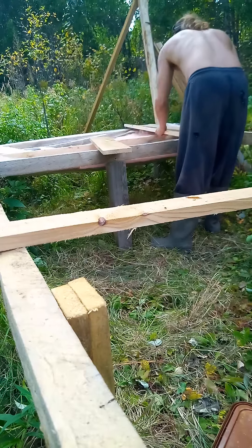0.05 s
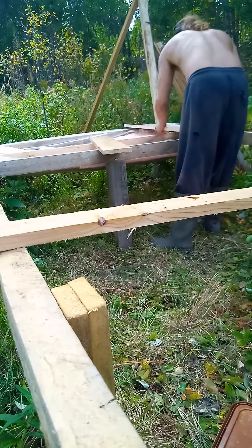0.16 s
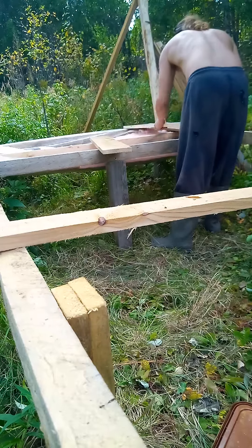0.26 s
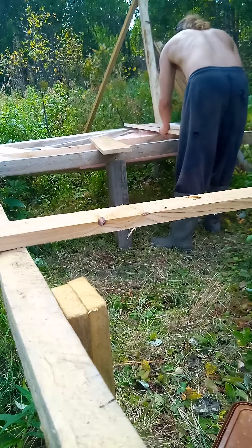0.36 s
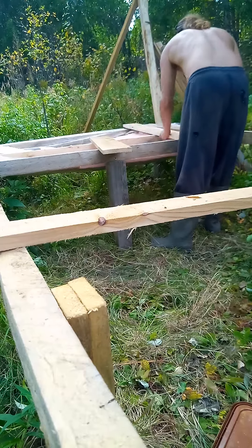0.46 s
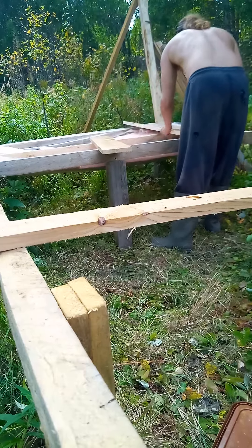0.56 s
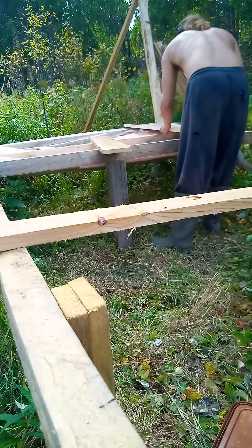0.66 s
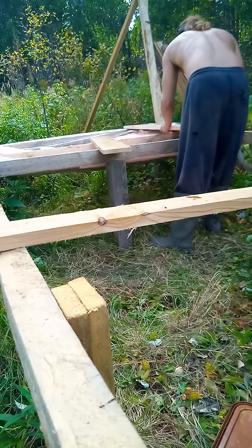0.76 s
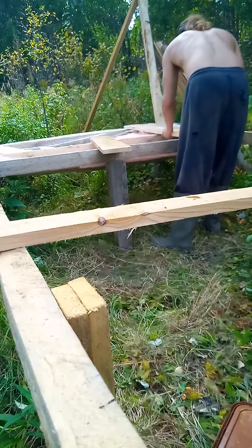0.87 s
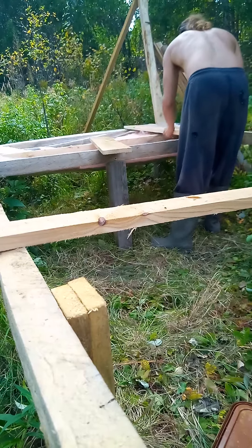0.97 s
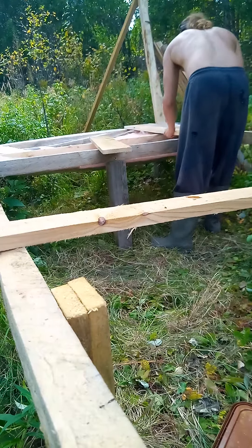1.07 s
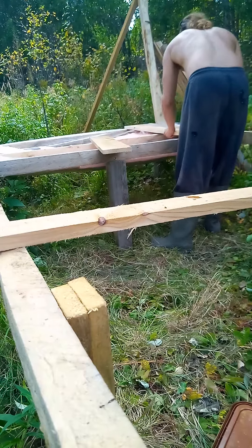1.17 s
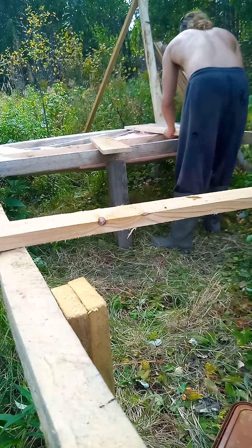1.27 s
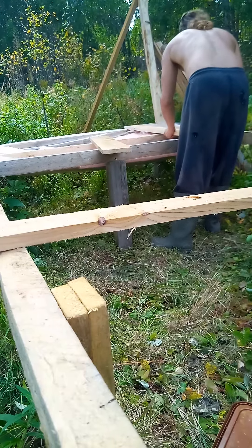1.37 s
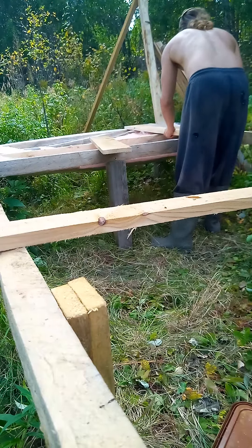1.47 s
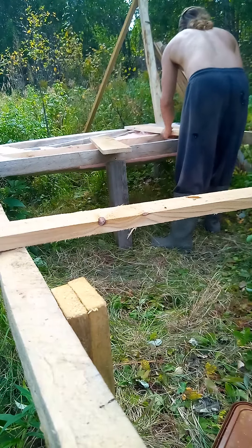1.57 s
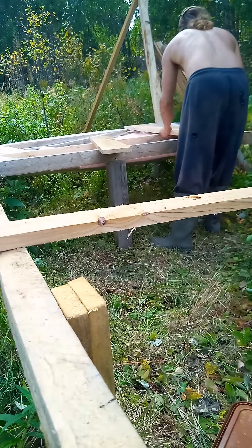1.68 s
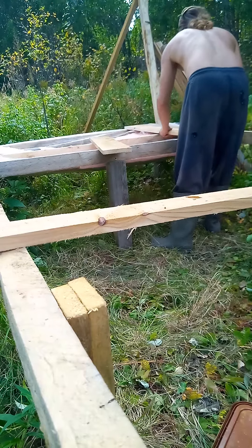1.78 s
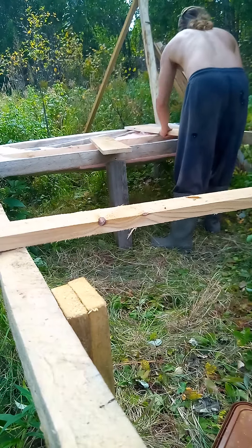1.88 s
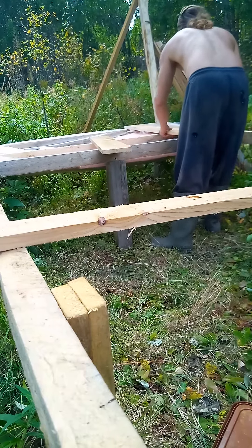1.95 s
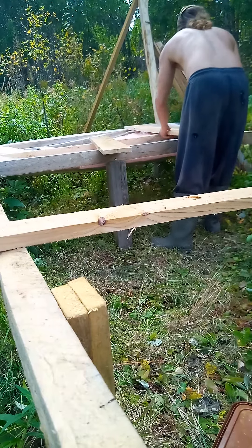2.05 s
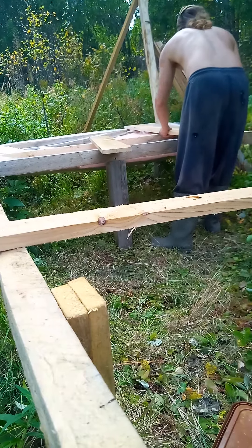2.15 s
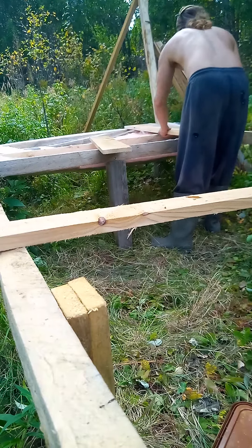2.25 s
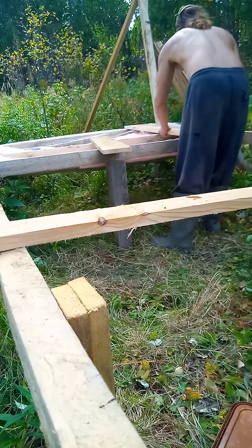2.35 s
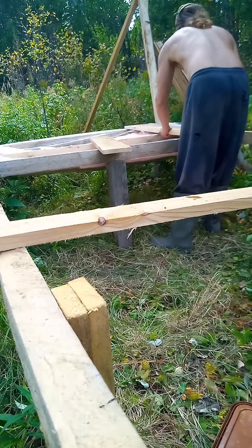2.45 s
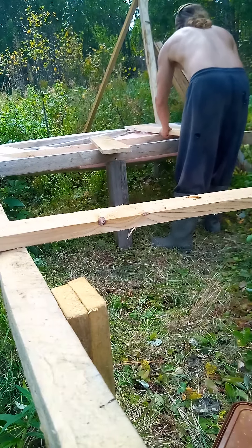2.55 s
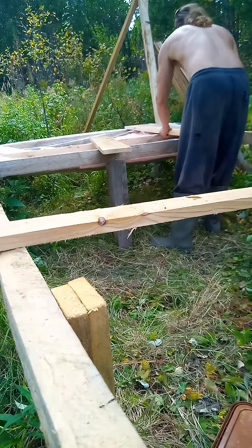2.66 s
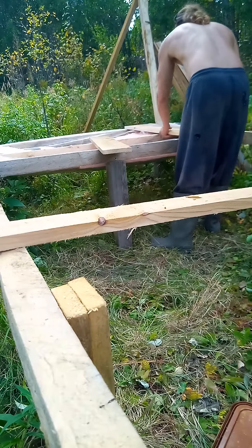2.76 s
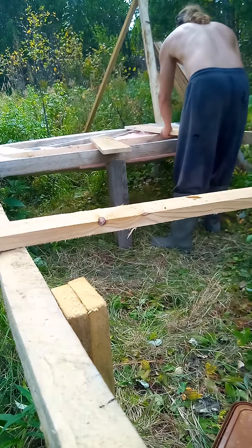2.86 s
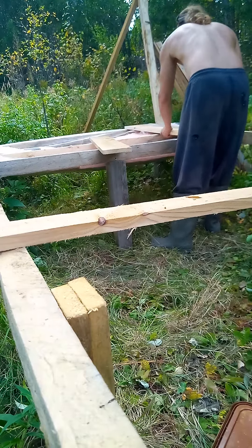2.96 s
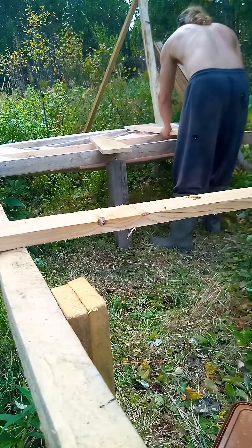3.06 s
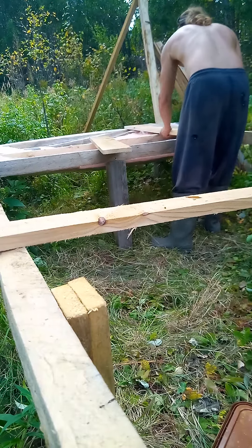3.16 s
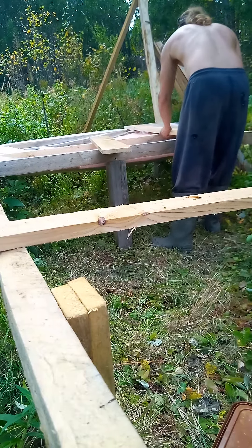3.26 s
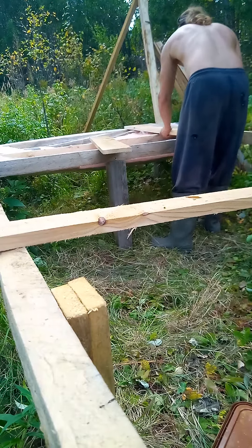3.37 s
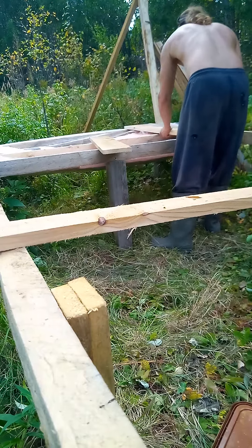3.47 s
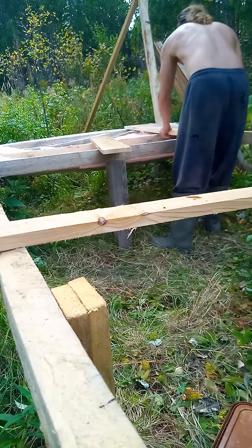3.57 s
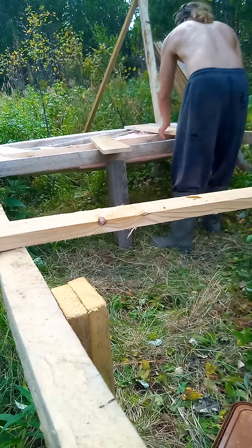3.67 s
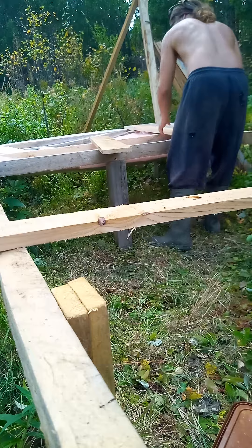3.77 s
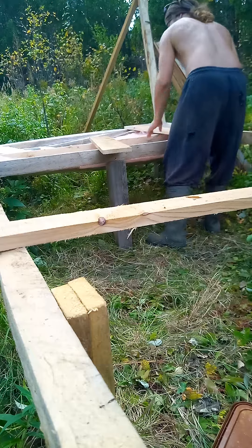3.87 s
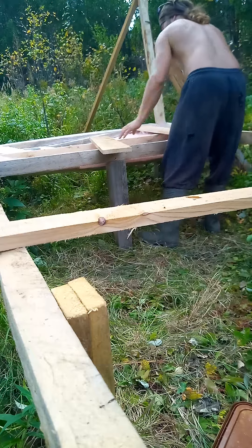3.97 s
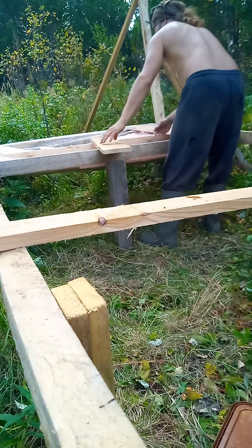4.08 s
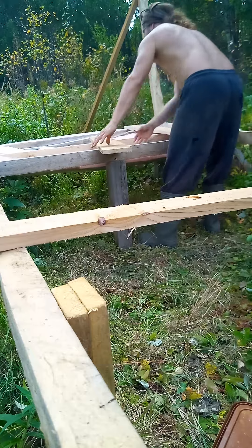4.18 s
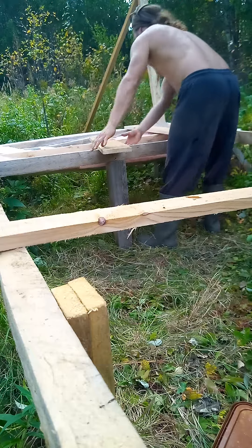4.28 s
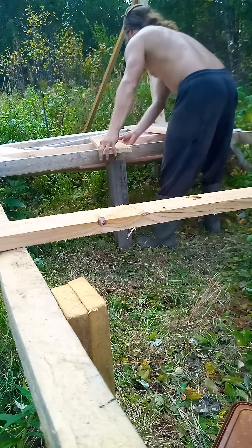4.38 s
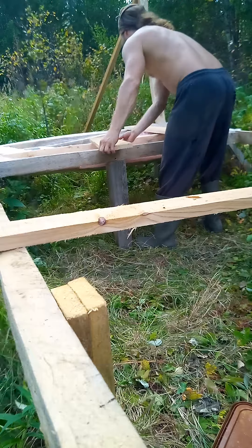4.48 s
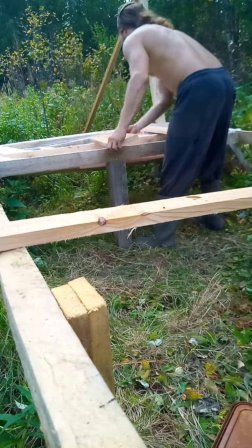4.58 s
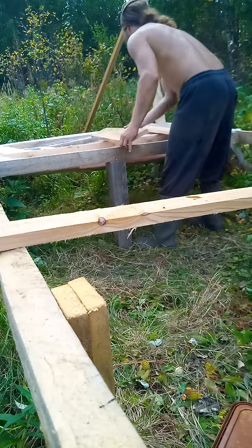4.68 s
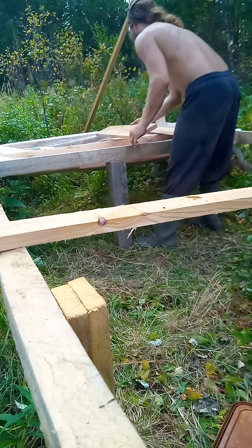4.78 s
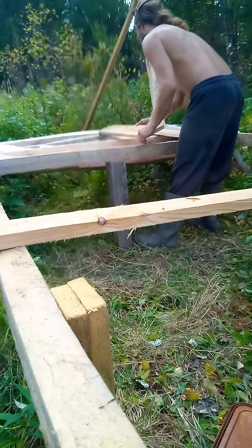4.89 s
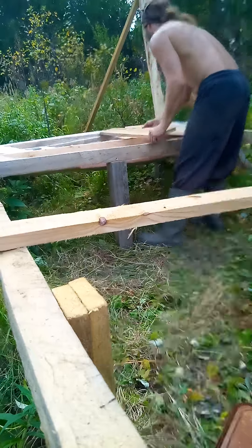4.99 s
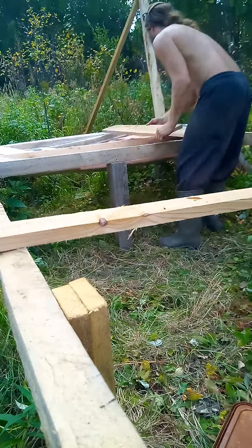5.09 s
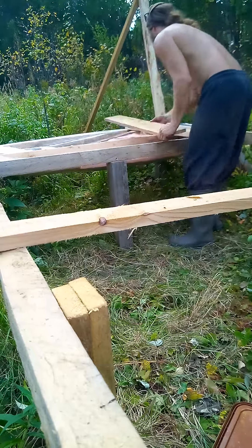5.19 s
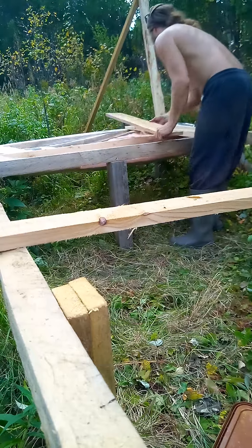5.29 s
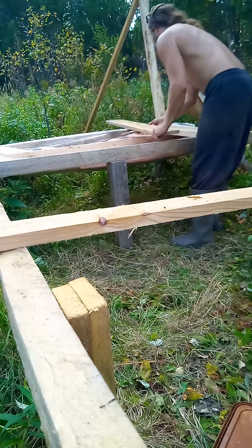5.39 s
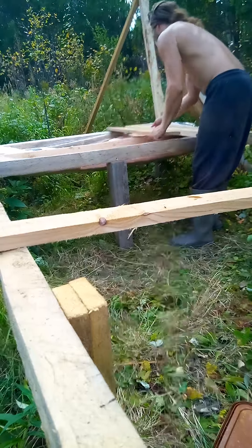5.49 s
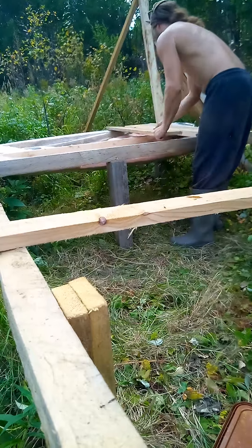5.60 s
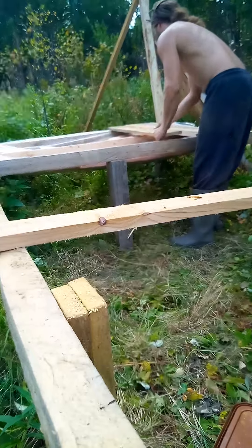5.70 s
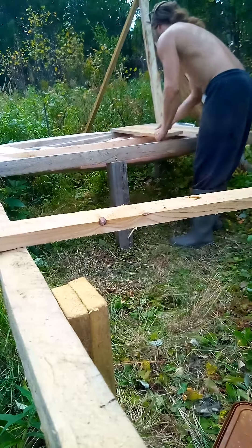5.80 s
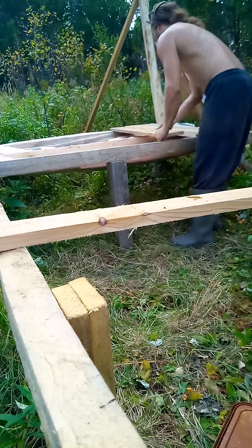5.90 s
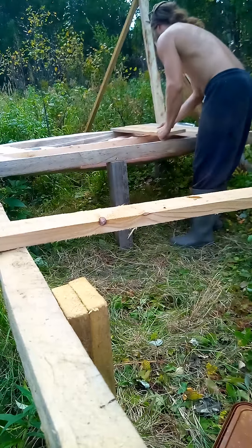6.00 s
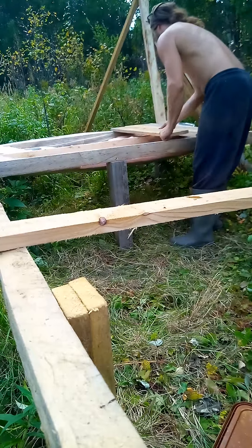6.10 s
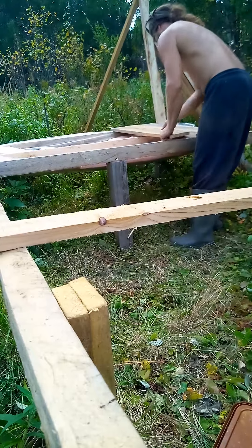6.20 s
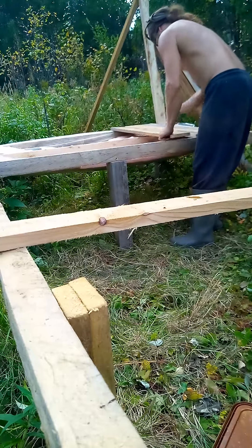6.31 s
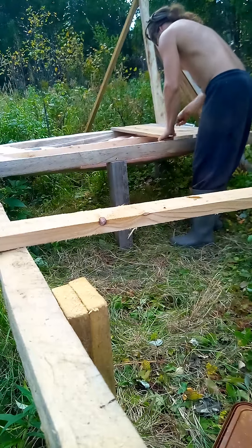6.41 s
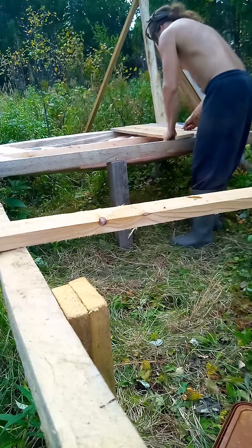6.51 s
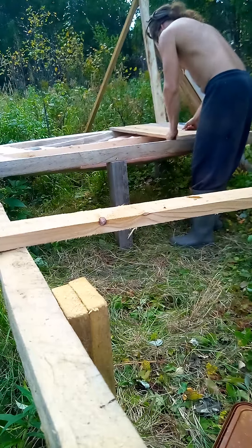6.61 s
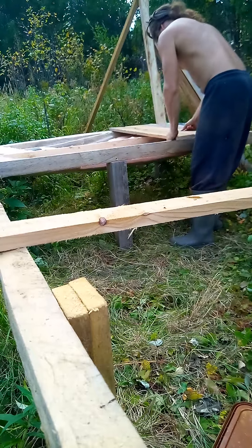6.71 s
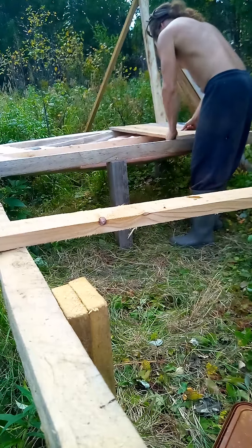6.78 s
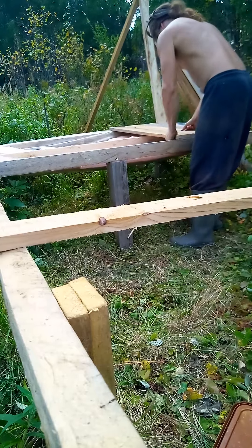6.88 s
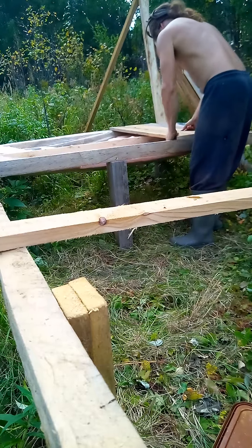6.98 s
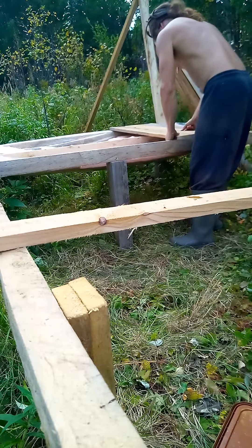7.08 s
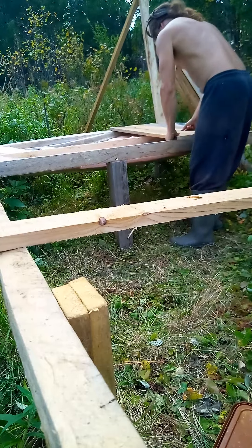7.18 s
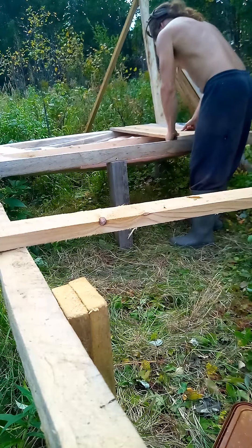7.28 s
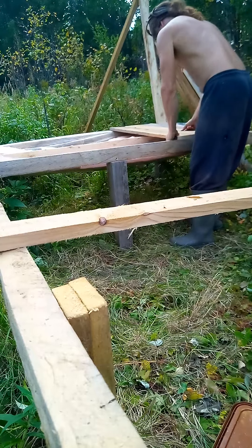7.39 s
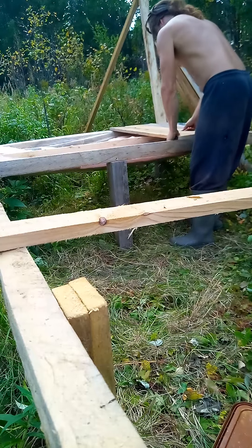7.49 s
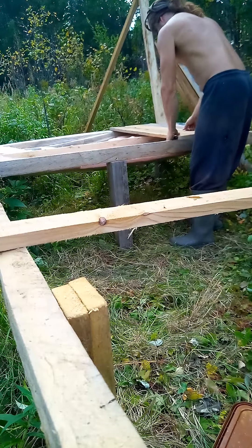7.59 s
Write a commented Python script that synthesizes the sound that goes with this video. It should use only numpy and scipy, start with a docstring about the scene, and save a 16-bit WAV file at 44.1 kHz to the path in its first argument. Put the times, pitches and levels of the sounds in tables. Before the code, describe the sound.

Wooden boards knock on a timber trestle in a quick, clattering run with a tiny squeak. After a lull with a few faint taps, a board slides with a rumbling rasp and drops with deep thuds and a splintery clatter. Lighter scrapes and knocks follow. Leaves hiss very faintly in the surrounding meadow, and a phone microphone makes the knocks swell and fall away quickly.

```python
"""Faint leaves hiss far off in a meadow; then wooden boards knock, slide and drop on a timber trestle.
Every blow rings the beam, the long plank and the short boards, and hard blows add a splintery clatter.
Sliding boards rumble, rasp and squeak, heavy loads sway the trestle, and dry grass crackles.
A phone's noise suppressor turns loud sounds up and drops back on their tails."""
import sys
import numpy as np
from scipy import signal
from scipy.fft import rfft, irfft
from scipy.io import wavfile
from scipy.ndimage import uniform_filter1d, minimum_filter1d

SR = 44100
rng = np.random.default_rng(int(sys.argv[2]) if len(sys.argv) > 2 else 0)


def transcribe(u):
    """Save the signal u as a 16-bit wav file named by the first command-line argument.

    u: samples, shape (n,) or (channels, n), limited to [-1, 1]; the rate is SR.
    q: integer samples, one column per channel.
    """
    v = np.clip(np.atleast_2d(u).T, -1, 1)
    q = np.round(v * 32767).astype(np.int16)
    wavfile.write(sys.argv[1], SR, q)


N = 337365

# The tone colour of three noises. Each row: frequency in Hz, relative level in dB.
LEAF_SPECTRUM = [(15, -46.5), (25, -21.5), (80, -1), (194, -4.5), (284, -8), (324, -8), (1010, -17.5),
                 (1780, -11), (2090, -10.5), (3780, -5), (5090, -6), (6850, -11.5), (8050, -24),
                 (11000, -26), (13300, -41.5), (14800, -28), (15800, -34.5)]
RASP_SPECTRUM = [(290, -25.5), (500, 3), (658, -9.5), (805, -4), (1010, -12.5), (1280, -6.5), (5920, -7),
                 (8250, -20.5), (15800, -36)]
CLATTER_SPECTRUM = [(300, -20.5), (600, 3.5), (1200, 3), (2400, -1.5), (5000, -9.5), (7000, -14.5),
                    (10000, -22), (12500, -37.5), (15800, -35.5)]
# How loud the leaves are. Each row: time in seconds, level in dB.
LEAF_LEVELS = [(0.0, -66.5), (5.05, -66.5), (7.65, -68.5)]
# Dry grass. Each row: start in seconds, level in dB, centre in Hz, width in octaves, fade time in
# seconds. A fade time (t60) is how long a sound takes to fall by 60 dB.
GRASS_CRACKLES = [(0.222, -54.5, 4630, 0.68, 0.12), (3.22, -76.5, 9610, .4, .04),
                  (5.613, -75, 7670, .08, 0.053), (6.437, -65.5, 7800, 1.1, 0.055)]
# A board slipping. Each row: start in seconds, length in seconds, pitch in Hz, level in dB.
BOARD_SQUEAKS = [(0.726, 0.047, 1560, -57), (4.429, 0.08, 780, -66)]
# Wood on wood, one list per slide. Each row: time in seconds, rumble in dB, rasp in dB.
BOARD_SLIDES = [
    [(0.72, -80, -73), (0.768, -57, -69), (0.86, -94, -105)],
    [(4.46, -72, -76), (4.57, -63.5, -73)],
    [(4.965, -68.5, -74), (4.985, -34.5, -53.5), (5.122, -57, -66.5), (5.32, -69, -70)],
    [(5.62, -64, -69), (5.738, -55, -70.5), (5.9, -69.5, -95), (6.05, -74.5, -90.5)],
    [(6.52, -73, -74), (6.642, -62.5, -70), (6.76, -56, -64), (6.82, -82, -108)],
]
# Heavy loads on the trestle. Each row: start in seconds, level in dB.
HEAVY_LOADS = [(4.977, -48), (5.592, -45.5), (5.78, -55)]
# The tones the wood rings with. Each row: pitch in Hz, relative level in dB, fade time in seconds.
BEAM_TONES = [(70, -16, 0.091), (94.1, -6.5, 0.18), (109.6, -0.5, .15), (139.2, 5, 0.2), (151.9, 1.5, 0.1)]
PLANK_TONES = [(179.1, -1.5, 0.18), (232.3, -4.5, 0.16), (252, 2.5, 0.15), (274.6, -9.5, 0.2)]
SHORT_BOARD_TONES = [(310.4, 0.5, .14), (349.6, -8, 0.1331), (367.8, 2, 0.14), (432, -9.5, 0.1426),
                     (495, -15, 0.3)]
UPPER_TONES = [(519, -9, 0.046), (593, -4.5, 0.04), (717, -8, .07), (799, -2, 0.06), (905, -6.5, 0.03),
               (964, -4, 0.041), (1021, -5, 0.029), (1154, -3, 0.045), (1288, -3.5, 0.064),
               (1398, -6, 0.038)]
CRACK_TONES = [(1591, -7.5, 0.035), (1786, -7.5, 0.031), (1907, -11, 0.064), (2123, -8, 0.033),
               (2496, -4.5, 0.027), (2712, -9.5, .025), (2937, -7.5, 0.014), (3230, -9.5, 0.028),
               (3700, -15, 0.059), (4312, -13, 0.026), (5400, -12.5, .015), (6720, -12.5, 0.023)]
# Knocks and drops. Each row: start in seconds, strength in dB, lean in dB (plus favours the short
# boards, minus the beam), contact time in milliseconds.
WOOD_BLOWS = [(0.064, -53.5, 8.5, 0.47), (0.089, -62, 12.5, 0.43), (0.474, -30.5, -6.5, 0.037),
              (0.5, -55, 15.5, 0.23), (0.539, -41, -6, 0.11), (0.557, -46.5, 3.5, 0.18),
              (0.627, -58, -7, 0.62), (0.745, -49, 0, 0.18), (0.779, -46.5, 18, 0.74),
              (0.808, -55, -6.5, 0.36), (0.926, -24.5, 1.5, 0.29), (0.941, -31, 7.5, 0.28),
              (0.955, -28, 9.5, 0.25), (0.969, -25.5, 7.5, 0.41), (1.015, -30.5, 3.5, 0.75),
              (1.104, -27.5, 5.5, 0.65), (1.125, -35.5, 10.5, 0.93), (1.896, -60.5, 22, 0.11),
              (1.906, -58.5, 17.5, 0.033), (1.951, -60, 22, 0.19), (2.292, -65.5, 26.5, 0.073),
              (2.348, -58, 19, 0.59), (2.52, -63, -13.5, 0.57), (2.592, -61.5, 18.5, 0.3),
              (2.614, -73.5, 18.5, 0.24), (4.212, -71, -6, 0.68), (4.483, -54, -2, 0.82),
              (4.514, -50, -1, .9), (4.578, -26.5, 12, 0.48), (4.619, -33, 2.5, 0.62),
              (4.845, -70, -9.5, .5), (4.976, -38, 0.5, 0.04), (4.994, -46, 7, 0.065),
              (5.025, -42, -7, 0.12), (5.087, -52, -7, 1.4), (5.154, -44.5, 9.5, 0.18),
              (5.228, -50.5, 15.5, 0.63), (5.56, -33, 12, 0.14), (5.566, -32.5, 12, 0.072),
              (5.578, -26.5, 6.5, 0.2), (5.596, -23, 7.5, 0.38), (5.756, -43.5, -12, 0.46),
              (5.806, -45, -7.5, 1), (5.893, -46.5, -6, 1.5), (6.537, -53, -10, 0.3),
              (6.592, -51.5, -7, 0.58), (6.634, -46.5, -1, 0.09), (6.67, -49.5, -3.5, 0.19),
              (6.725, -42, -0.5, 0.43), (6.742, -43.5, -2, 1.7), (7.039, -38.5, 8, 0.95),
              (7.055, -35.5, -2.5, 0.83), (7.557, -47, 3.5, 0.17)]
# How a blow reaches the short boards, beam, plank, upper tones and crack tones. Each row: level in dB
# at no lean, share of the lean, random spread in dB, build-up in cycles, landing time in seconds.
BLOW_REACH = [(-15.5, 0.99, 7, 3.5, .006), (-15, -1.0, 4, 1.2, 0.0063), (-7.5, -0.19, 4, 1.9, .006),
              (-7, 0.72, 5, 5.5, .012), (1, 0.66, 4, 6, .008)]


def from_db(db):
    """Turn decibels into a gain."""
    return 10 ** (np.asarray(db) / 20)


def rms_one(x):
    """Scale a sound to an average (rms) level of 1."""
    return x / np.sqrt(np.mean(x ** 2) + 1e-20)


def level_curve(rows, column):
    """Join a table's dB levels with straight lines; silent before and after."""
    rows = np.array(rows)
    return np.interp(np.arange(N) / SR, rows[:, 0], rows[:, column], left=-150, right=-150)


def coloured_noise(spectrum):
    """Steady noise with the given tone colour."""
    hz = np.maximum(np.fft.rfftfreq(N, 1 / SR), 1)
    points = np.array(spectrum)
    shape = from_db(np.interp(np.log(hz), np.log(points[:, 0]), points[:, 1]))
    return rms_one(irfft(rfft(rng.standard_normal(N)) * shape, N))


def drift(per_s):
    """A curve that wanders from one random value to the next."""
    knots = rng.standard_normal(int(N / SR * per_s) + 2)
    return np.interp(np.arange(N) / SR * per_s, np.arange(len(knots)), knots)


def grains(per_s, spread_db):
    """Random clicks of uneven size."""
    sizes = from_db(spread_db * np.minimum(rng.exponential(1, N), 4)) * rng.choice([-1, 1], N)
    return rms_one(sizes * (rng.random(N) < per_s / SR))


def ring(clicks, hz, t60):
    """Each click starts a pure tone that fades away."""
    r, w = from_db(-60 / (t60 * SR)), 2 * np.pi * hz / SR
    return signal.lfilter([0, np.sin(w)], [1, -2 * r * np.cos(w), r * r], clicks + 1e-18)


def build_up(x, hz, cycles):
    """A broad resonance makes a tone grow over a few cycles."""
    r, w = from_db(-60 * hz / (cycles * SR)), 2 * np.pi * hz / SR
    return signal.lfilter([(1 - r * r) / 2, 0, (r * r - 1) / 2], [1, -2 * r * np.cos(w), r * r], x)


def leaves():
    """Far leaves make a smooth hiss that flickers a little."""
    return coloured_noise(LEAF_SPECTRUM) * from_db(level_curve(LEAF_LEVELS, 1) + .6 * drift(per_s=3.5))


def grass_crackles():
    """Dry grass gives fading bursts of tiny, high clicks."""
    t, out = np.arange(N) / SR, np.zeros(N)
    clicks = grains(per_s=4000, spread_db=2.0)
    for start, level_db, hz, octaves, t60 in GRASS_CRACKLES:
        band = signal.butter(2, hz * 2 ** (octaves / 2 * np.array([-1, 1])), "band", fs=SR, output="sos")
        fade = (t >= start) * from_db(level_db - 60 * np.maximum(t - start, 0) / t60)
        out += rms_one(signal.sosfilt(band, clicks)) * fade
    return out


def squeaks():
    """A slipping board sings a short, slightly rough tone that swells and fades."""
    t, out = np.arange(N) / SR, np.zeros(N)
    for start, length, hz, level_db in BOARD_SQUEAKS:
        swell = np.sin(np.pi * np.clip((t - start) / length, 0, 1))
        out += from_db(level_db + 5.2 * drift(per_s=80)) * swell * np.sin(2 * np.pi * hz * t)
    return out


def slides(fade_scale=0.7):
    """Sticking and slipping shakes the wood, which rings less when held down; fine grit rasps above."""
    slips = grains(per_s=460, spread_db=5.0)
    rumble = rms_one(sum(from_db(db) * build_up(ring(slips, hz, fade_scale * t60), hz, cycles=2.5)
                         for hz, db, t60 in BEAM_TONES + PLANK_TONES + SHORT_BOARD_TONES))
    rasp = coloured_noise(RASP_SPECTRUM) * from_db(2.1 * drift(per_s=120))
    return sum(from_db(level_curve(slide, 1)) * rumble + from_db(level_curve(slide, 2)) * rasp
               for slide in BOARD_SLIDES)


def trestle_sway(hz=69.6):
    """The heaviest loads rock the whole trestle: one deep tone that dies slowly."""
    starts, level_db = np.transpose(HEAVY_LOADS)
    pushes = np.zeros(N)
    pushes[(starts * SR).astype(int)] = from_db(level_db)
    return build_up(ring(pushes, hz, t60=0.55), hz, cycles=2.5)


def clatter(offset_db=-12.5, centre_hz=1530, rise_s=0.0052, t60=0.11):
    """A splintery burst of noise follows each blow, strong only when the contact is short."""
    starts, strength_db, lean_db, contact_ms = np.transpose(WOOD_BLOWS)
    softness = (1 + (2 * np.pi * centre_hz * contact_ms / 1000) ** 2) ** 1.5
    crack_share = BLOW_REACH[-1][1]
    kicks = np.zeros(N)
    kicks[(starts * SR).astype(int)] = from_db(offset_db + strength_db + crack_share * lean_db) / softness
    fade = signal.lfilter([1], [1, -from_db(-60 / (t60 * SR))], kicks + 1e-18)
    rise = np.exp(-1 / (rise_s * SR))
    return coloured_noise(CLATTER_SPECTRUM) * signal.lfilter([1 - rise], [1, -rise], fade)


def blows(touches=3, touch_step_db=-4):
    """A board's edge lands in a few uneven touches that ring the wood; longer contact sounds duller."""
    starts, strength_db, lean_db, contact_ms = np.transpose(WOOD_BLOWS)
    steps = np.arange(SR // 100)
    contact_samples = np.maximum(contact_ms, .02)[:, None] * SR / 1000
    pulse = steps ** 2 * np.exp(-1.5 * steps / contact_samples)
    pulse /= pulse.sum(axis=1, keepdims=True)
    groups = [SHORT_BOARD_TONES, BEAM_TONES, PLANK_TONES, UPPER_TONES, CRACK_TONES]
    out = np.zeros(N)
    for tones, (reach_db, share, spread_db, cycles, landing_s) in zip(groups, BLOW_REACH):
        blow_db = strength_db + reach_db + share * lean_db
        for hz, level_db, t60 in tones:
            # Each tone is struck with its own random strength, timing and direction.
            chance = rng.random((len(starts), 1 + 2 * touches))
            gain = from_db(blow_db + level_db + spread_db * (2 * chance[:, 0] - 1))
            force = np.zeros(N)
            for k in range(touches):
                at = np.round((starts + landing_s * chance[:, 1 + k] ** 2) * SR).astype(int)
                push = gain * from_db(k * touch_step_db) * np.sign(chance[:, -1 - k] - .5)
                np.add.at(force, at[:, None] + steps, push[:, None] * pulse)
            out += build_up(ring(force, hz, t60), hz, cycles)
    return out


def suppressor(band, open_at_db, range_db, boost_db, hold_s):
    """Turn a band up while it is loud, hold briefly, then drop back."""
    level_db = 10 * np.log10(uniform_filter1d(band ** 2, size=441) + 1e-12)
    hold = int(hold_s * SR)
    held_db = -minimum_filter1d(-level_db, hold + 1, origin=hold // 2)
    opening = np.clip((held_db - open_at_db) / range_db, 0, 1)
    return band * from_db(boost_db * uniform_filter1d(opening, size=441))


def scene(bass_cut_hz=48):
    """Mix everything into one channel; the wood sends little deep bass through the air."""
    wood = blows() + clatter() + trestle_sway() + slides() + squeaks()
    wood = signal.sosfilt(signal.butter(4, bass_cut_hz, "high", fs=SR, output="sos"), wood)
    return (wood + grass_crackles() + leaves())[None]


def record(dry):
    """The suppressor treats bass and treble separately; the highest treble is cut off."""
    split_hz, top_hz = 475, 16050
    bass = signal.sosfiltfilt(signal.butter(2, split_hz, fs=SR, output="sos"), dry[0])
    treble = dry[0] - bass
    out = suppressor(bass, open_at_db=-66.5, range_db=8.4, boost_db=7.7, hold_s=0.016)
    out += suppressor(treble, open_at_db=-58.5, range_db=2.15, boost_db=3.44, hold_s=0.036)
    return signal.sosfilt(signal.cheby2(18, 40, top_hz, fs=SR, output="sos"), out)[None]


dry = scene()
out = record(dry)
transcribe(out)
```